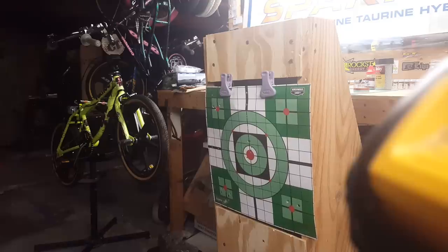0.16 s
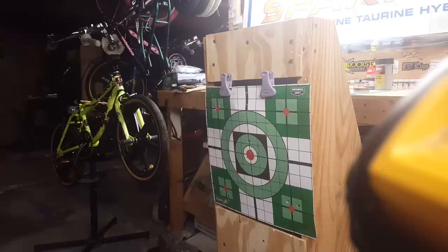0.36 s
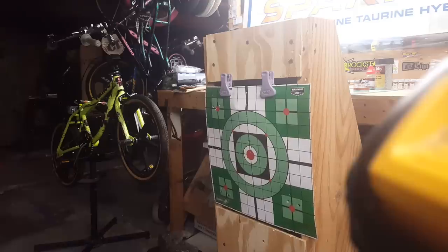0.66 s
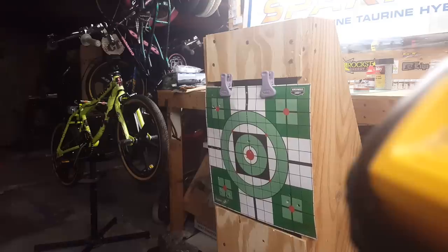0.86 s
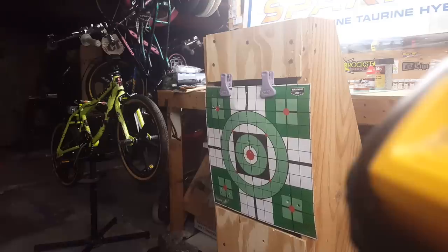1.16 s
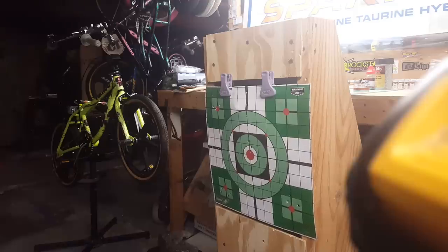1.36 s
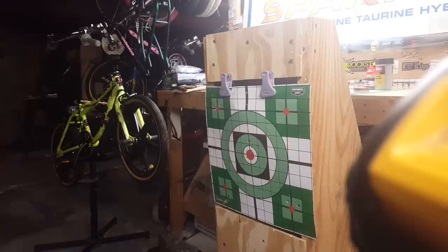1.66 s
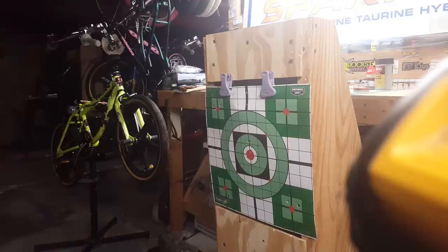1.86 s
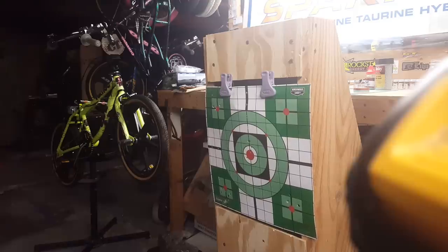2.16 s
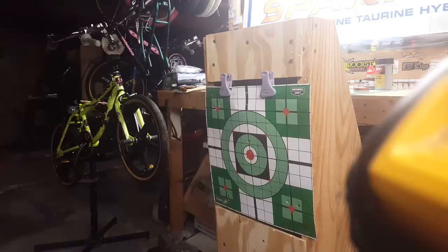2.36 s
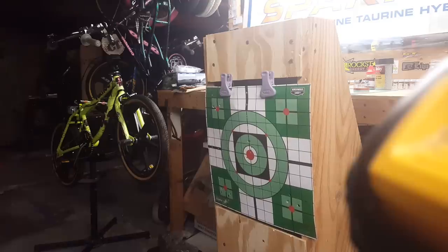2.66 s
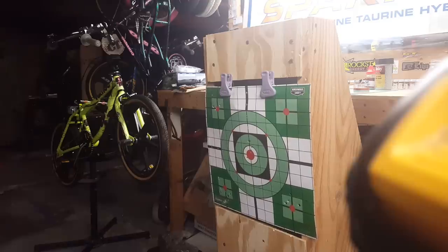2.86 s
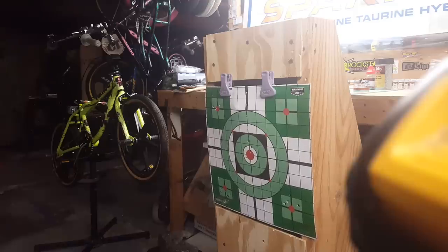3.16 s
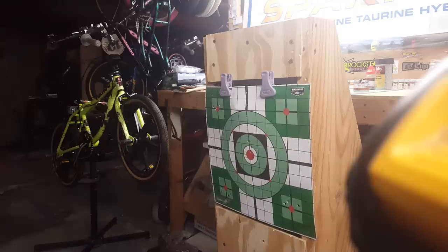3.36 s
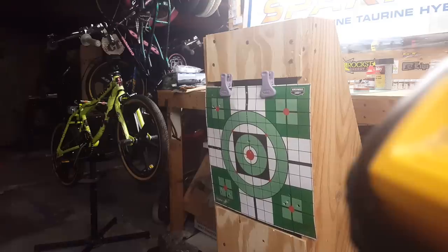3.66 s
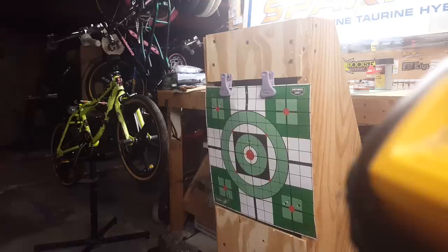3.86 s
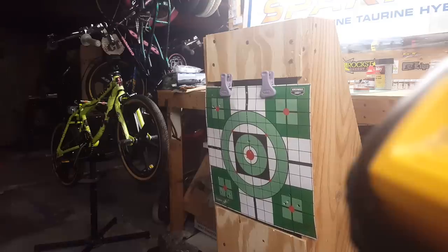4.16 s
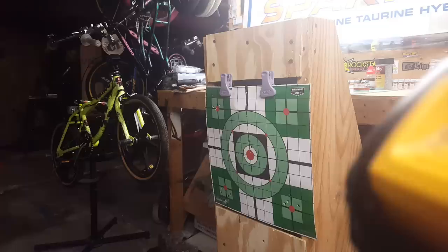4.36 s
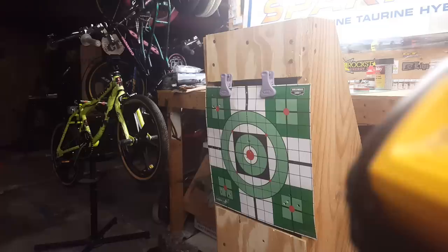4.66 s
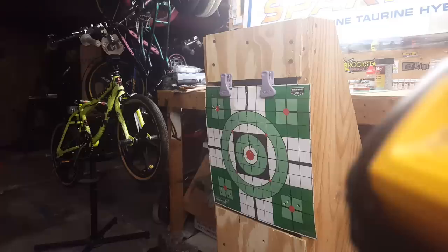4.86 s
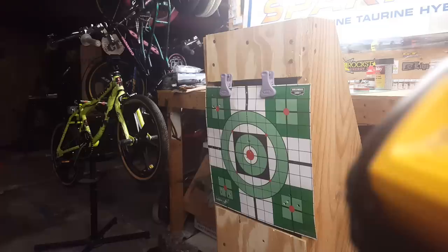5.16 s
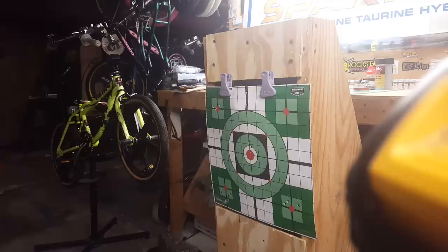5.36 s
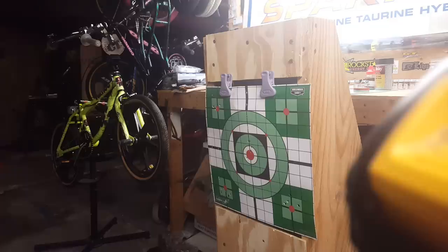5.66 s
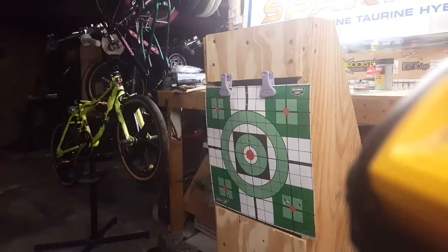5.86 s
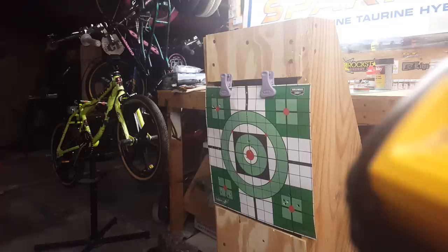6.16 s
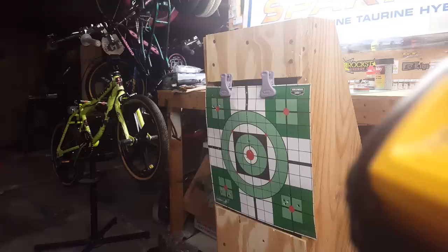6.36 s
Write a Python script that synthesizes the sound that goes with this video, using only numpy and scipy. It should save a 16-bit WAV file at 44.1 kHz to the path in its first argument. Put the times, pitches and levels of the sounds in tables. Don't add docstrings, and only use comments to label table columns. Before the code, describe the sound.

An air revolver cracks three times from the left, pellets thumping a wooden target close by, over quiet distant traffic rumble in a reverberant garage.

```python
import sys
import numpy as np
from scipy import signal
from scipy.io import wavfile
from scipy.ndimage import uniform_filter1d, minimum_filter1d

SR = 44100
rng = np.random.default_rng(int(sys.argv[2]) if len(sys.argv) > 2 else 0)


def to_linear_factor(level_db):
    exponent = np.asarray(level_db, float) / 20
    return 10 ** exponent


def pcm_store(signal):
    levels = np.round(np.clip(np.atleast_2d(signal), -1, 1) * 32767)
    wavfile.write(sys.argv[1], SR, levels.astype(np.int16).T)


N = 287528

# (blast [s], pellet strike [s])
SHOTS = [
    (.5659, .6022),
    (2.8525, 2.9031),
    (5.8839, 5.9350),
]
# (blast [dB], sharpness [dB], thump [dB],
# pitch the struck spot drives most [Hz], boom of the deepest modes [dB])
FORCE = [(8, 3.5, 4, 1400, -7), (7.5, 2, 4.5, 620, 0), (5, -3.5, 5, 1060, -1.5)]
SPACING_S = 19 / 44100


def blasts():
    # (delay [s], level [dB], lag of the right microphone [s])
    walls = [
        (.0068, -6, 0.036),
        (.0152, 1, -0.0083),
        (.023, -22.5, 0.0001),
    ]
    # (frequency [Hz], level [dB per Hz])
    blast_colour = [(35, -34.5), (60, -22), (161, -2.5), (311, -9.5), (586, -5.5), (1130, -1.5),
                    (2240, -1.5), (3600, -3), (5400, -7), (8500, -10), (10600, -4.5), (15000, 0),
                    (18000, -8)]
    out = np.zeros((2, N))
    t = np.arange(900) / SR
    for (s, _), (blast_db, sharp_db, *_) in zip(SHOTS, FORCE):
        shock = (1 - t / 0.00014) * np.exp(-t / 0.000096) * (1 - np.exp(-t / 0.00004))
        barrel = np.sin(2 * np.pi * 640 * t) + 0.76 * np.sin(2 * np.pi * 2300 * t)
        barrel = barrel * to_linear_factor(-4 - 0.68 * sharp_db - 60 * t / 0.026)
        hiss = to_linear_factor(sharp_db + 4.5) * burst(2200, 26000, 0.0046, size=900)
        pulse = shock * 5.9 - barrel + hiss
        shaded = signal.lfilter([0.35], [1, -0.65], pulse)
        add(out, s, to_linear_factor(blast_db) * np.array([pulse, shaded * to_linear_factor(-2.0)]), SPACING_S)

        echo = np.array([0.6 * pulse + shaded, shaded])
        for delay, wall_db, lag in walls:
            add(out, s + delay, to_linear_factor(blast_db + wall_db) * echo, lag)

        colour = [(hz, db + 0.35 * sharp_db * (hz > 1500)) for hz, db in blast_colour]
        tail = garage(colour, build_s=0.003) * to_linear_factor([[0.8], [-0.8]])
        add(out, s, to_linear_factor(blast_db - 7.5) * tail, SPACING_S)
    return out


def thumps():
    # (frequency [Hz], level [dB], t60 [s])
    plywood = [(178.3, 3.5, 0.27), (305, -5.5, 0.25), (412, -3.5, 0.25), (620, -6.5, 0.57), (672, -3, 0.36),
               (733, -4, 0.61), (907, -0.5, 0.27), (1033, -6, 0.37), (1270, -5, .2), (1427, -4, 0.29)]
    # (frequency [Hz], level [dB per Hz])
    thump_colour = [(35, -34), (60, -28), (170, -17.5), (304, -3.5), (600, -12.5), (1000, -10.5),
                    (1850, -11.5), (3000, -13.5), (4640, -17.5), (7080, -19.5), (10100, -18),
                    (15000, -15.5), (18000, -20.5)]
    out = np.zeros((2, N))
    t = np.arange(SR // 3) / SR
    both = np.ones((2, 1))
    for (_, hit), (*_, thump_db, spot_hz, boom_db) in zip(SHOTS, FORCE):
        wood = 0
        for hz, db, t60 in plywood:
            octaves_off = np.log2(hz / spot_hz)
            drive_db = rng.normal(0, 4.5) + 7.5 * np.exp(-(octaves_off / 0.3) ** 2)
            mode_db = db + drive_db + boom_db * (hz < 350) - 60 * t / min(t60, 0.3)
            wood = wood + to_linear_factor(mode_db) * np.sin(2 * np.pi * hz * t)
        crack_db = thump_db + 4.5
        crack = (0.5 * burst(500, 15000, 0.005) + 0.8 * burst(430, 3500, 0.02)) * both
        add(out, hit, to_linear_factor(crack_db) * crack, 0.0002)
        add(out, hit + 0.01, to_linear_factor(crack_db - 8.0) * crack, -0.0002)
        add(out, hit + 0.0013, to_linear_factor(thump_db - 26.5) * wood * both, 0.0002)
        add(out, hit, to_linear_factor(thump_db - 13) * garage(thump_colour, build_s=0.002))
    return out


def pellet_skips():
    # (time [s], peak [dB], ring [Hz], top [Hz], left-right difference [dB])
    skip_list = [
        (0.8615, -38.5, 1000, 2600, 6),
        (0.873, -49, 384, 745, -9),
        (0.9432, -32.5, 1403, 16000, 9),
        (6.252, -54, 1400, 2980, 10),
        (6.272, -51.5, 2210, 3170, 18),
        (6.3174, -42, 718, 3060, 7.5),
        (6.344, -49, 1500, 3500, 4.5),
        (6.3684, -38, 790, 3140, 8),
    ]
    colour = [(200, -4), (1500, 9), (9000, -9), (16000, -2.5)]  # (frequency [Hz], level [dB per Hz])
    rattle_top_hz = 11800
    out = np.zeros((2, N))
    t = np.arange(4000) / SR
    room = garage(colour, build_s=0.001) / np.sqrt(SR / 50)
    for s, db, ring_hz, top_hz, pan_db in skip_list:
        rattle_s = 0.032 + 0.0031 * top_hz / 1000
        knock = burst(250, min(top_hz, rattle_top_hz), rattle_s)
        if top_hz > rattle_top_hz:
            knock = knock + to_linear_factor(2.5) * burst(310, top_hz, 0.0004)
        ring = np.sin(2 * np.pi * ring_hz * t) * to_linear_factor(-60 * t * ring_hz / 16)
        knock = knock + 0.58 * ring
        add(out, s, to_linear_factor(db + 3.5) * knock * to_linear_factor([[pan_db / 2], [-pan_db / 2]]))
        add(out, s, to_linear_factor(db - 10.0) * signal.fftconvolve(room, knock[None], axes=1))
    return out


def gun_action():
    # (time [s], level [dB], lowest [Hz], top [Hz])
    clicks = [
        (1.069, -51, 2060, 14200),
        (1.1587, -42.5, 1830, 14500),
        (3.136, -43, 5880, 16900),
        (3.4782, -37.5, 1500, 16650),
        (6.165, -43.5, 894, 12000),
        (6.4697, -40.5, 2000, 16970),
    ]
    # (frequency [Hz], level [dB per Hz])
    hammer_colour = [(200, -17), (1500, 6.5), (4500, 2.5), (9000, -10), (16000, -1.5)]
    out = np.zeros((2, N))
    for s, db, low_hz, top_hz in clicks:
        click = burst(low_hz, top_hz, 0.000083)
        room = garage(hammer_colour, build_s=0.0012) / np.sqrt(SR / 50)
        add(out, s, to_linear_factor(db - 1.5) * click * to_linear_factor([[2.5], [-2.5]]), SPACING_S)
        add(out, s, to_linear_factor(db + 15.0) * signal.fftconvolve(room, click[None], axes=1))
    return out


def room_tone():
    # (frequency [Hz], level [dB per Hz])
    tone_colour = [(15, -53), (30, -24), (60, -2), (83, -2), (146, -3), (226, -9), (440, -9), (830, -14),
                   (1060, -14), (2500, -21), (4240, -28), (8140, -31.5), (11000, -32.5), (18000, -35.5)]
    # (frequency [Hz], likeness [-1 to 1])
    tone_likeness = [(60, 0.57), (150, 1), (400, 0.93), (1200, 0.28), (4000, 0.13), (15000, 0.069)]
    # (time [s], level [dB])
    tone_level = [(0, 1), (.6, 0.5), (1.101, -4), (1.699, -0.5), (2.8, 0.5), (3.3, 3), (3.9, 0), (5.8, 0.5),
                  (6.25, 2.5), (6.52, 0)]
    # (frequency [Hz], width [Hz], level [dB])
    hums = [(60, 9.1, 0.5), (86, 18, 1.5), (145, 4.9, 5), (303, 11, 1.5), (610, 14, 1), (698, 42, 3.5),
            (830, 43, 9.5), (960, 49, 2.5)]
    swell_db = np.interp(np.arange(N) / SR, *np.transpose(tone_level))
    tone = 0
    for hz, pair in bands(N, tone_likeness):
        flicker_db = 1.3 * drift(26)
        tone = tone + to_linear_factor(at_hz(tone_colour, hz) + swell_db + flicker_db) * pair
    for hz, width_hz, db in hums:
        tone = tone + to_linear_factor(db - 4.5) * signal.lfilter(*signal.iirpeak(hz, hz / width_hz, fs=SR), tone)
    tone = rms_one(tone) * to_linear_factor([[0.5], [-0.5]])
    return to_linear_factor(-52) * np.array([tone[0], np.roll(tone[1], round(SPACING_S * SR))])


def garage(spectrum, build_s):
    # (frequency [Hz], t60 [s])
    room_t60 = [(100, 0.3), (250, .24), (600, 0.33), (1500, 0.27), (4000, 0.29), (8500, 0.23),
                (11500, .235), (16000, .155)]
    # (frequency [Hz], left-right likeness [-1 to 1])
    room_likeness = [(60, 0.5), (180, 0.85), (350, 0.74), (700, 0.3), (1650, 0.05), (4970, 0.02),
                     (15000, 0.1)]
    t = np.arange(2 * SR // 5) / SR
    knots = np.arange(0, 0.51, 0.005)
    echoes = 0.68 * rng.standard_normal(len(knots))
    tail = 0
    for hz, pair in bands(len(t), room_likeness):
        patches_db = np.interp(t, knots, echoes + 3.2 * rng.standard_normal(len(knots)))
        decay_db = 60 * t / at_hz(room_t60, hz)
        tail = tail + to_linear_factor(at_hz(spectrum, hz) + patches_db - decay_db) * pair
    tail = tail * (1 - np.exp(-t / build_s))
    return tail / np.sqrt(np.mean(tail[:, :SR // 25] ** 2))


def burst(low_hz, top_hz, t60, size=4000):
    noise = rng.standard_normal(size) * to_linear_factor(-60 * np.arange(size) / SR / abs(t60))
    noise[0] += 4.5
    band = signal.butter(4, [low_hz, min(top_hz, 0.45 * SR)], "band", fs=SR, output="sos")
    crack = signal.sosfilt(band, noise)
    return crack / np.abs(crack).max()


def bands(size, likeness):
    edges = 26 * 2 ** np.arange(0, 9.9, 0.5)
    white = rng.standard_normal((2, 2, size))
    for k, (low, high) in enumerate(zip(edges, edges[1:])):
        band = signal.butter(2, [low, high], "band", fs=SR, output="sos")
        mid, side = signal.sosfilt(band, white[k % 2])
        hz = np.sqrt(low * high)
        alike = np.clip(at_hz(likeness, hz), -1, 1)
        yield hz, np.sqrt(1 + alike) * mid + np.sqrt(1 - alike) * side * [[1], [-1]]


def drift(rate_hz):
    r = np.exp(-80 * np.pi * rate_hz / SR)
    slow = signal.lfilter([1], [1, -2 * r, r * r], rng.standard_normal(N // 40 + 2002))[2000:]
    return np.interp(np.arange(N) / 40, np.arange(len(slow)), rms_one(slow))


def rms_one(x):
    return x / np.sqrt(np.mean(x ** 2) + 1e-20)


def at_hz(points, hz):
    table_hz, values = np.transpose(points)
    return np.interp(np.log(hz), np.log(table_hz), values)


def add(out, s, sound, lag_s=0.0):
    for side in (0, 1):
        i = round((s + side * lag_s) * SR)
        out[side, i:i + sound.shape[1]] += sound[side, :N - i]


def scene():
    return blasts() + thumps() + pellet_skips() + gun_action() + room_tone()


def taps(hz, width_hz):
    r = np.exp(-np.pi * width_hz / SR)
    row = np.array([1, -2 * r * np.cos(2 * np.pi * hz / SR), r * r])
    return row / row.sum()


def microphone(x):
    x = signal.lfilter(taps(9880, 2500), taps(8290, 1300), x)
    return signal.sosfilt(signal.butter(2, 45, "high", fs=SR, output="sos"), x)


def held(cut_db, release_db_s):
    ramp = release_db_s * np.arange(N) / SR
    return np.maximum.accumulate(cut_db + ramp) - ramp


def limiter(x):
    level_db = 10 * np.log10(uniform_filter1d(np.max(x ** 2, axis=0), size=45) + 1e-12)
    over_db = np.maximum(level_db + 7.5, 0)
    ahead_db = -minimum_filter1d(-over_db, size=353, origin=-176)
    fast_db = held(ahead_db, release_db_s=270.0)
    lingering_db = held(np.minimum(over_db, 8.0), release_db_s=8.5)
    return x * to_linear_factor(-uniform_filter1d(np.maximum(fast_db, lingering_db), size=130))


def band_limit(x):
    return signal.sosfilt(signal.butter(12, 17060, fs=SR, output="sos"), x)


def record(dry):
    mix = limiter(microphone(dry))
    mix = mix + to_linear_factor(-79.5) * np.diff(rng.standard_normal((2, N + 1)))
    mix = signal.sosfilt(signal.cheby2(16, 26, 16050, fs=SR, output="sos"), mix)
    return band_limit(np.clip(mix, -1, 1))


dry = scene()
out = record(dry)
pcm_store(out)
```